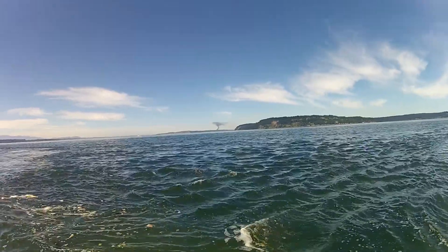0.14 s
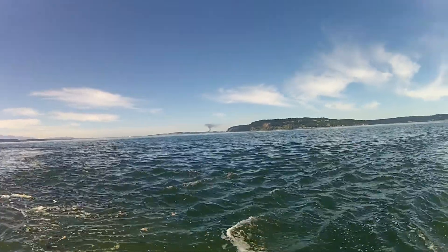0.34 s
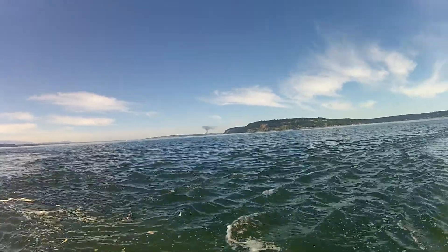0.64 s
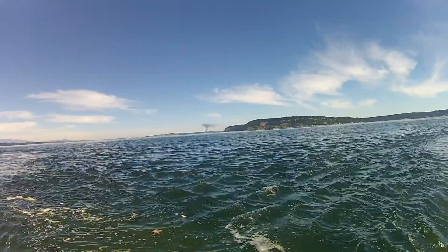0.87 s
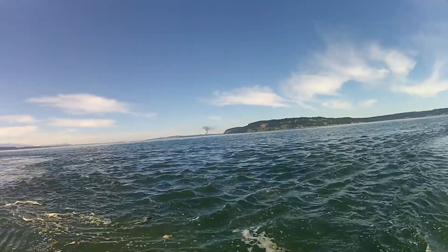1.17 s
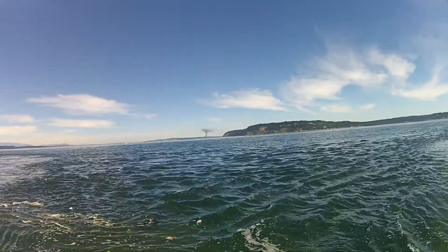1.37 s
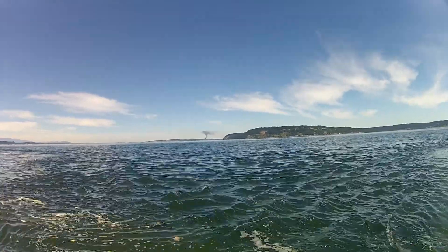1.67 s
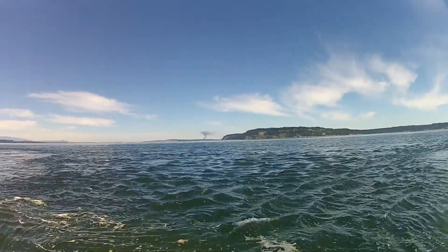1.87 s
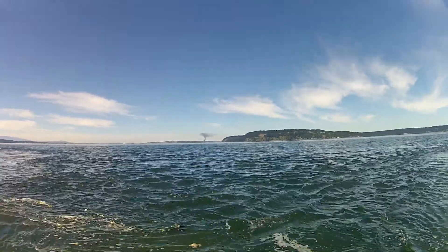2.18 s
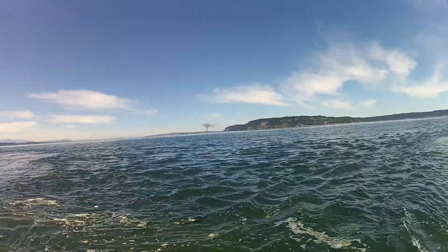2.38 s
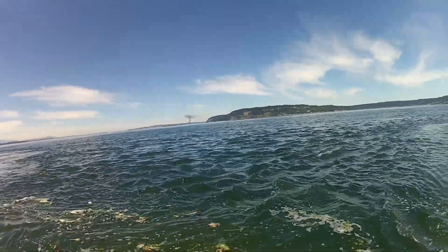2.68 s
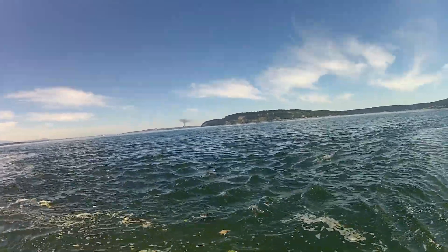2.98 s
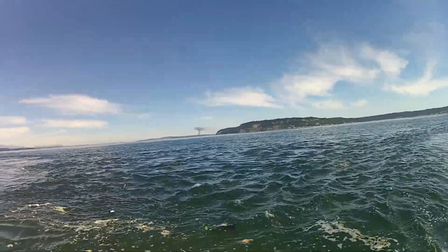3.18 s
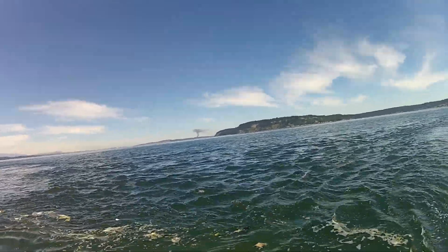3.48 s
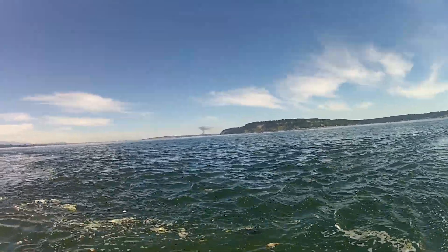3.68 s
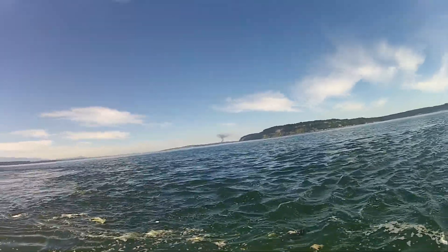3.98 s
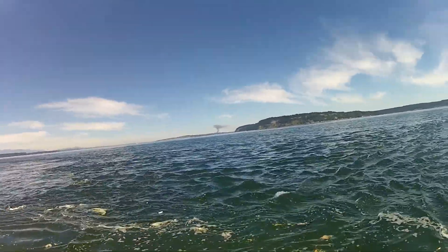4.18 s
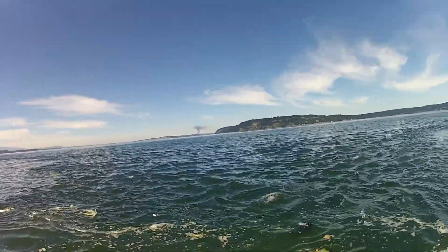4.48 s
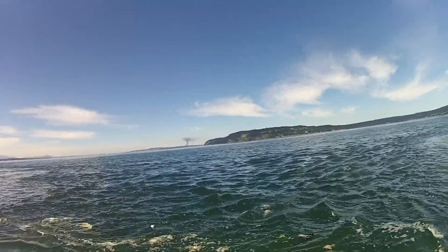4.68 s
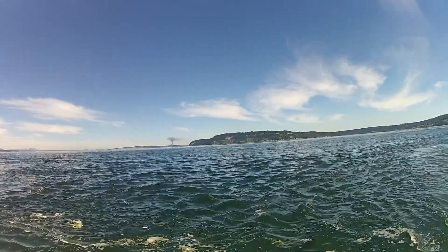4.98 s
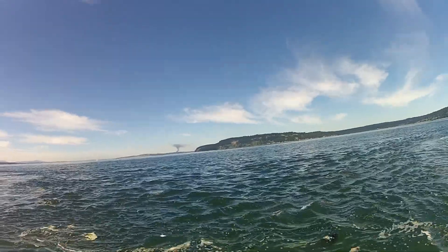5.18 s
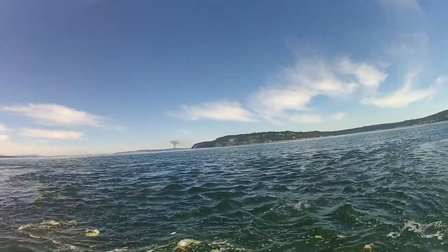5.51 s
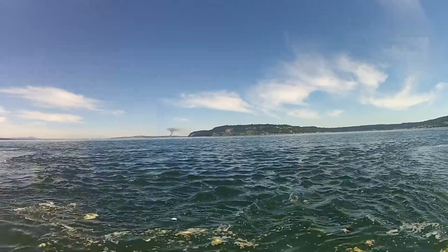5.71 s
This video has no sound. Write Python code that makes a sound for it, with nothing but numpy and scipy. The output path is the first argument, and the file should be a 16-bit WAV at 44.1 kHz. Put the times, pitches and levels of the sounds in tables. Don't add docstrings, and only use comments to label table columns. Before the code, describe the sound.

Nearly silent choppy water, then a sudden loud splash slapping a small boat and a sealed plastic housing, breaking up into smaller drips and slaps.

```python
import sys
import numpy as np
from scipy import signal
from scipy.fft import rfft, irfft
from scipy.io import wavfile
from scipy.ndimage import uniform_filter1d

SR = 44100
rng = np.random.default_rng(int(sys.argv[2]) if len(sys.argv) > 2 else 0)


def store_wav(level_fs):
    pcm = np.round(np.clip(np.atleast_2d(level_fs), -1, 1) * 32767)
    wavfile.write(sys.argv[1], SR, pcm.T.astype(np.int16))


def level_to_linear(level):
    exponent = np.asarray(level, float) / 20
    return 10 ** exponent


N = 257984

# time_s, chop_db, cavity_hum_db
CALM = [
    (0, -65.5, -71),
    (.4, -66, -75),
    (.8, -66.5, -94),
    (1.5, -66, -85),
    (2.5, -66, -84),
    (4.0, -65, -79),
    (5.85, -65, -95),
]
# frequency_hz, density_db (per Hz)
CHOP_SPECTRUM = [(150, -22), (250, -5), (450, -12), (750, -12.5), (950, -9.5), (1400, -14.5), (1650, -12.5),
                 (1850, -15.5), (2150, -10.5), (2400, -18), (2800, -16), (3600, -18.5), (5000, -21.5),
                 (6000, -23.5)]
# centre_hz, width_hz, level_db
CAVITY_MODES = [(2212, 225, 0)]
# frequency_hz, density_db (per Hz)
WALLOW_SPECTRUM = [(8.8, -42), (15, 1.5), (38, -2.5), (60, -2), (114, -6), (200, -5.5), (318, -15),
                   (351, -23.5), (700, -39), (910, -34.5), (1540, -120)]
# frequency_hz, density_db (per Hz)
SWELL_SPECTRUM = [(8.8, -58.5), (15, 6), (47, -1), (128, -5), (187, -5.5), (226, -9), (313, -9),
                  (500, -13.5), (650, -20), (1100, -120)]
# crest_s, level_db, hold_s
SURGES = [(2.212, -56, 0.065), (2.552, -48, 0.0078), (2.748, -51, 0.069), (2.882, -41, .04),
          (3.08, -43, 0.045), (3.247, -40.5, 0.052), (3.406, -37, 0.016), (3.578, -25, 0.022),
          (3.693, -40, 0.025), (3.947, -45, 0.028), (4.28, -55, .05), (4.58, -70, 0.055),
          (4.883, -53, 0.023), (5.082, -59, 0.12), (5.396, -56, .05), (5.616, -48.5, 0.021),
          (5.78, -53, .03)]

# time_s, strength_db, fineness_db (of the spray), mist_db (thrown up)
SLOSH = [(0, -84, 13, -3), (2.6, -79, 7.5, 0), (2.67, -54, -1, -14), (2.85, -44.5, -0.5, -10),
         (2.862, -37.5, 6.5, -3), (2.96, -34.5, 5, -2.5), (3.31, -33, 2, -7), (3.345, -41.5, -4.5, -12),
         (3.4, -29, 2.5, -11.5), (3.585, -29.5, -1.5, -13), (3.61, -39.5, -3.5, -9), (3.9, -46, 4, -11),
         (4.06, -63.5, 3, -9), (4.92, -57.5, -5.5, -8), (5.36, -59, -3, -17), (5.47, -46.5, 3, -18),
         (5.75, -53, 0, -12), (5.85, -63, -1, -15)]
# start_s, level_db, fineness_db, length_s, fade_t60_s
GUSHES = [(2.856, -22.5, -3.5, 0.0039, 0.091), (2.889, -24.5, -5.5, 0.01, 0.18),
          (2.905, -49, -3, 0.026, 0.15), (3.07, -44.5, -13, 0.046, 0.26),
          (3.251, -53.5, 10.5, 0.031, 0.031), (3.369, -34.5, 3, 0.06, 0.02),
          (3.489, -32.5, -0.5, 0.032, .06), (3.52, -42, 8.5, 0.062, 0.11), (3.666, -44, -9, 0.047, 0.015),
          (3.892, -60, 11.5, 0.047, 0.0092), (4.048, -56, -2, 0.025, 0.046), (4.125, -58, -8, 0.033, 0.028),
          (4.253, -57.5, -6, 0.044, .03), (4.337, -54.5, -7, 0.018, 0.028),
          (4.769, -58.5, -5.5, 0.058, 0.047), (4.889, -51.5, -6, 0.011, 0.025),
          (5.082, -63, 11, 0.019, 0.058), (5.195, -52, -2, 0.0065, 0.022),
          (5.303, -65.5, 10.5, 0.012, 0.025), (5.349, -55.5, -6, 0.039, 0.027),
          (5.385, -44, 7, 0.023, 0.067), (5.44, -60, 5, 0.034, 0.019), (5.498, -63.5, 6, 0.041, 0.15),
          (5.678, -59, -3, 0.1, 0.049)]
# start_s, peak_db, fineness_db, fade_t60_s
SLAPS = [(0.31, -50, 14, 0.055), (0.499, -45.5, -2, 0.037), (2.55, -50, -8, 0.05), (2.654, -32.5, -7, 0.11),
         (2.767, -36.5, 3, 0.032), (2.837, -32, -5, 0.019), (2.857, -7.5, 1, 0.061), (2.867, -7, -8, 0.037),
         (2.894, -3.5, -25, 0.06), (2.987, -16, 4.5, 0.057), (3.492, -12, -2, 0.045),
         (3.562, -13.5, -13, 0.1), (3.654, -24, 2, 0.05), (3.711, -24.5, 12, 0.018), (3.933, -37, 6, 0.055),
         (4.078, -34, 4, 0.021), (4.894, -37, -1, 0.045), (4.952, -39.5, -8, 0.041),
         (5.084, -35.5, -1, 0.061), (5.238, -43.5, 6, 0.071), (5.495, -34, -5, .04), (5.783, -27, 9, 0.044)]
# start_s, peak_db, fineness_db, fade_t60_s
DRIPS = [(1.505, -56, 5, .04), (2.908, -28, 7, .07), (3.074, -24.5, 2.5, 0.044), (3.453, -30, 8, 0.082),
         (3.51, -19, 3, .12), (3.545, -26, 0, .1), (4.0, -43, -2, 0.056), (4.295, -49, 0, .04),
         (4.35, -47, 1.5, .04), (4.23, -36, -7, 0.03), (4.389, -44, 3, .018), (4.439, -44, 2.5, 0.094),
         (4.574, -48, 1, 0.017), (5.178, -42.5, 3, 0.046), (5.204, -41, -5, 0.024), (5.305, -47, 10, .029),
         (5.393, -33, 2, .024), (5.424, -49, 2, .03)]
# centre_hz, width_hz, level_db
LOW_MODES = [(659, 41, -10), (911, 137, 2), (955.7, 59, -4), (1037.7, 98, 3), (1208, 86, 1),
             (1559, 320, -4.5)]
# centre_hz, width_hz, level_db
MIDDLE_MODES = [(1688, 128, -5.5), (1820, 133, -12), (1890, 244, 0.5), (2166, 21, -9)]
# centre_hz, width_hz, level_db
TOP_MODES = [(2790, 300, -2.5), (3017, 294, -0.15), (3550, 106, 1), (3816, 160, 1), (4100, 245, -0.49)]
# centre_hz, width_hz, level_db
MIST_MODES = [(4300, 470, -0.5), (4910, 560, 0), (5216, 310, 2), (5570, 530, -1.5)]
# frequency_hz, density_db (per Hz)
SPRAY_SPECTRUM = [(250, -40), (450, -39), (1000, -48), (2300, -3.5), (2450, -63), (2700, 0), (4250, -11),
                  (4600, 1), (6000, -7)]

# start_s, peak_db, pitch_hz
TICKS = [(0.177, -58, 3800), (0.3119, -45.5, 4320), (0.328, -57, 4700), (2.515, -53, 4260),
         (3.7366, -43, 4190), (3.7406, -36, 4500), (3.768, -49, 4100), (3.799, -47, 4100),
         (3.8564, -56, 4050), (4.359, -52, 4520), (4.3834, -48, 3840), (4.553, -55, 4000),
         (4.586, -55.5, 3620), (4.596, -48.5, 4500), (5.658, -45.5, 4170), (5.759, -48.5, 3460),
         (5.7724, -46, 4330), (5.78, -39.5, 4600)]
# start_s, peak_db, pitch_hz, t60_s, crack_db (of the blow)
THUMPS = [(2.191, -41, 96, 0.063, -27), (2.548, -38, 92.5, 0.056, -11), (2.858, -26, 154, 0.05, -2),
          (2.968, -16, 76, 0.027, -30), (3.561, -26, 154, 0.072, -9), (3.581, -23.5, 168, 0.066, -9),
          (3.609, -26, 189, 0.073, -4.5), (3.716, -33, 46, 0.068, -22), (3.951, -40, 51.4, 0.093, -5),
          (4.268, -48, 96, 0.053, -4), (4.489, -37, 88, 0.24, -39), (4.589, -50, 40.6, 0.054, -27),
          (4.89, -33, 69.5, 0.043, -14), (5.066, -44.5, 102, 0.056, -4.5), (5.421, -51, 99, 0.075, -15),
          (5.784, -24, 83, 0.041, -13.5), (5.821, -37.5, 90, 0.056, -16)]

# share in dB, and dB gained per dB of fineness
SLOSH_SHARE_DB, SLOSH_GAIN = (-7, -10), (0.39, 1.08)
GUSH_SHARE_DB, GUSH_GAIN = (-8.5, -9), (1, 1.28)
SLAP_SHARE_DB, SLAP_GAIN = (-16.5, -15), (0.87, 1.36)
DRIP_SHARE_DB, DRIP_GAIN = (-1.5, -13), (0.96, 1.2)

HEAVE_DB, HEAVE_FOLLOWS_DB = -54.5, -13
SURGE_RISE_DB_PER_S, SURGE_FALL_DB_PER_S = 209, 187
GUSH_RISE_S, RISE_SHARE = 0.02, 0.37
PEAK_CEILING, STEP_EDGE_HZ, BAND_EDGE_HZ = 0.3, 5950, 15300


def evened(x):
    return x / np.sqrt(np.mean(x ** 2) + 1e-20)


def curve(rows):
    s, *columns = np.transpose(rows)
    return [np.interp(np.arange(N) / SR, s, c) for c in columns]


def add(mix, s, sound):
    part = mix[round(s * SR):][:len(sound)]
    part += sound[:len(part)]


def flicker(size, depth_db):
    smooth = uniform_filter1d(rng.standard_normal(N), size)
    return level_to_linear(depth_db * evened(uniform_filter1d(smooth, size)))


def droplets(per_s, spread_db, hiss):
    size = level_to_linear(spread_db * np.minimum(rng.exponential(1, N), 5)) * rng.choice([-1., 1.], N)
    impacts = evened(size * (rng.random(N) < per_s / SR))
    return evened(impacts + hiss * rng.standard_normal(N))


def coloured(x, points):
    f, db = np.transpose(points)
    hz = np.fft.rfftfreq(len(x), 1 / SR)
    gain_db = np.interp(np.log(hz + 1), np.log(f + 1), db, right=-120)
    return evened(irfft(rfft(x) * level_to_linear(gain_db), len(x)))


def ring(x, modes, patchy_db):
    out, t = np.zeros(N), np.arange(2048) / SR
    for hz, width, db in modes:
        decay = t * np.exp(-np.pi * 1.5 * width * t)
        body = decay * np.sin(2 * np.pi * hz * t)
        driven = x * flicker(size=1500, depth_db=patchy_db)
        out += level_to_linear(db) * signal.oaconvolve(driven, body / np.linalg.norm(body))[:N]
    return out / np.linalg.norm(level_to_linear(np.transpose(modes)[2]))


def heave():
    t, (s, db, hold) = np.arange(N) / SR, np.transpose(SURGES)[:, :, None]
    rise_db = SURGE_RISE_DB_PER_S * np.maximum(s - t, 0)
    fall_db = SURGE_FALL_DB_PER_S * np.maximum(t - s - hold, 0)
    surges = level_to_linear(db - rise_db - fall_db)
    return level_to_linear(HEAVE_DB) + level_to_linear(curve(SLOSH)[0] + HEAVE_FOLLOWS_DB) + surges.sum(axis=0)


def sea():
    chop_db, cavity_db = curve(CALM)
    patter = droplets(5000, 2.5, 1.0) * flicker(size=500, depth_db=0.94)
    chop = level_to_linear(chop_db) * coloured(patter, CHOP_SPECTRUM)
    cavity = level_to_linear(cavity_db) * ring(patter, CAVITY_MODES, patchy_db=2.0)
    wallow = coloured(rng.standard_normal(N) * flicker(size=900, depth_db=2.1), WALLOW_SPECTRUM)
    push = coloured(rng.standard_normal(N) * flicker(size=900, depth_db=2.2), SWELL_SPECTRUM)
    return chop + cavity + level_to_linear(-62.5) * wallow + level_to_linear(-8.0) * heave() * push


def shares(fine_db, share_db, gain):
    return [0 * fine_db] + [db + k * fine_db for db, k in zip(share_db, gain)]


def slosh(strength_db, fine_db):
    share_db = np.array(shares(fine_db, SLOSH_SHARE_DB, SLOSH_GAIN))
    return level_to_linear(strength_db + share_db - 5.5)


def add_gushes(drive):
    t = np.arange(SR // 4) / SR
    for s, db, fine_db, length, t60 in GUSHES:
        rise = np.minimum(t / min(GUSH_RISE_S, RISE_SHARE * length), 1)
        sheet = level_to_linear(db - 60 * np.maximum(t - length, 0) / max(t60, .01)) * rise
        for row, share_db in zip(drive, shares(fine_db, GUSH_SHARE_DB, GUSH_GAIN)):
            add(row, s, sheet * level_to_linear(share_db))


def add_blows(drive, knocks, blows, rule_db, gain):
    t = np.arange(SR // 4) / SR
    for s, db, fine_db, t60 in blows:
        _, mid_db, top_db = shares(fine_db, rule_db, gain)
        fade = level_to_linear(db - 19.5 - 60 * t / max(t60, .01)) * np.minimum(t / 0.0002, 1)
        knocks[:, round(s * SR) + 8] = level_to_linear(db + 9.5 + np.array([0, mid_db, top_db - 11.0]))
        for row, share_db in zip(drive, (0, mid_db, top_db)):
            add(row, s, fade * level_to_linear(share_db))


def splashes():
    strength_db, fine_db, mist_db = curve(SLOSH)
    drive, knocks = slosh(strength_db, fine_db), np.zeros((3, N))
    add_gushes(drive)
    drive *= flicker(size=260, depth_db=0.47)
    add_blows(drive, knocks, SLAPS, SLAP_SHARE_DB, SLAP_GAIN)
    add_blows(drive, knocks, DRIPS, DRIP_SHARE_DB, DRIP_GAIN)
    drops = droplets(5000, 4.64, 1.0)
    low, middle, top = drive * drops + knocks
    shell = ring(low, LOW_MODES, patchy_db=2.0) + ring(middle, MIDDLE_MODES, patchy_db=2.05)
    shell += ring(top, TOP_MODES, patchy_db=1.14)
    mist = ring(drive[2] * level_to_linear(mist_db) * drops[::-1], MIST_MODES, patchy_db=3.5)
    spray = drive[2] * coloured(np.roll(drops, SR), SPRAY_SPECTRUM)
    return shell + mist + level_to_linear(-10.5 + 0.43 * mist_db) * spray


def ticks():
    out, t = np.zeros(N), np.arange(200) / SR
    for s, db, hz in TICKS:
        snap = np.exp(-((t - .0005) / 0.00025) ** 2) * np.cos(2 * np.pi * 1.04 * hz * t)
        lid_fade = 0.24 * np.exp(-t / 0.0019) * np.minimum(t / 0.00026, 1)
        lid = lid_fade * np.sin(2 * np.pi * 4400 * t)
        add(out, s, level_to_linear(db + 5.5) * (snap + lid))
    return out


def thumps():
    out, t = np.zeros(N), np.arange(SR // 3) / SR
    dull = signal.butter(2, [250, 1100], "bandpass", fs=SR)
    puffs = rng.standard_normal((len(THUMPS), len(t)))
    for (s, db, hz, t60, crack_db), puff in zip(THUMPS, puffs):
        turns = hz * (t + 0.0017 * (1 - np.exp(-t / 0.01)))
        fade = level_to_linear(-60 * t / np.clip(t60, .03, .4)) * np.minimum(t / 0.0045, 1)
        push = fade * np.sin(2 * np.pi * turns)
        crack = level_to_linear(crack_db - 6.0 - 60 * t / 0.075) * evened(signal.lfilter(*dull, puff))
        add(out, s, level_to_linear(db + 2.0) * (push + crack))
    return out


def scene():
    return (sea() + splashes() + ticks() + thumps())[None]


def roll_off(x):
    return signal.sosfilt(signal.butter(12, 16470, fs=SR, output="sos"), x)


def record(dry):
    soft = PEAK_CEILING * np.tanh(dry / PEAK_CEILING)
    limited = signal.oaconvolve(soft, signal.firwin(61, STEP_EDGE_HZ, fs=SR)[None], "same")
    steps = np.repeat(signal.resample_poly(limited, 40, 147, axis=1), 4, axis=1)
    held = signal.resample_poly(steps, 147, 160, axis=1)[:, :N]
    edge = signal.firwin(511, BAND_EDGE_HZ, window=("kaiser", 9), fs=SR)
    return roll_off(signal.oaconvolve(held, edge[None], "same"))


dry = scene()
out = record(dry)
store_wav(out)
```